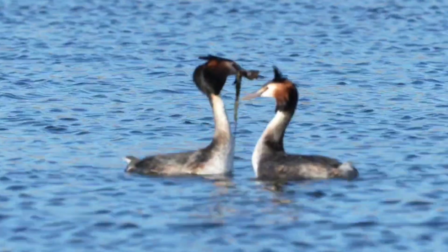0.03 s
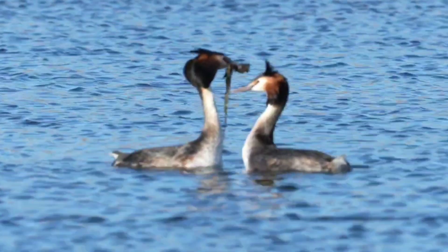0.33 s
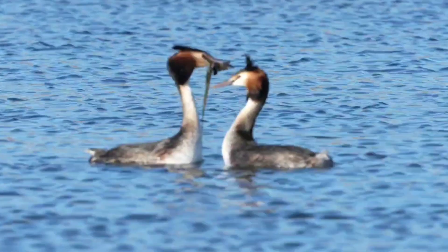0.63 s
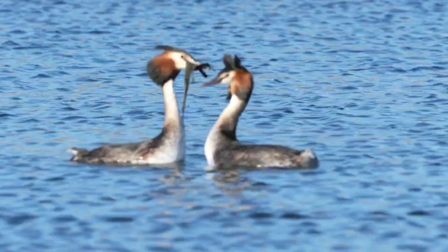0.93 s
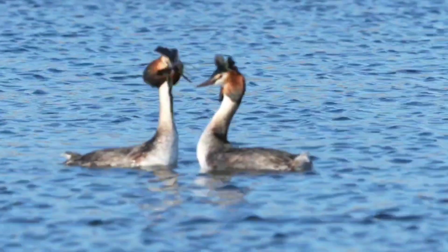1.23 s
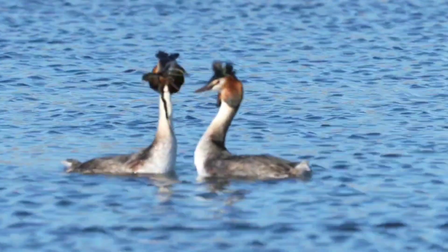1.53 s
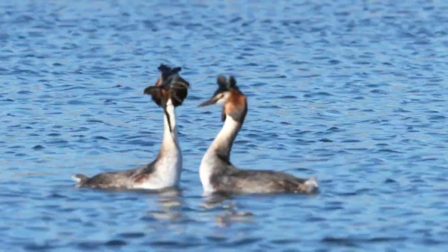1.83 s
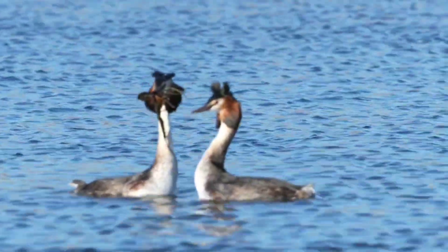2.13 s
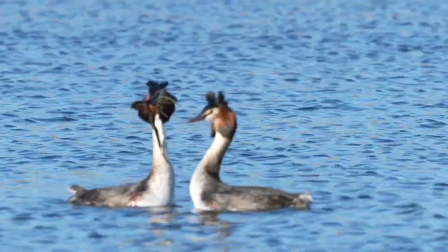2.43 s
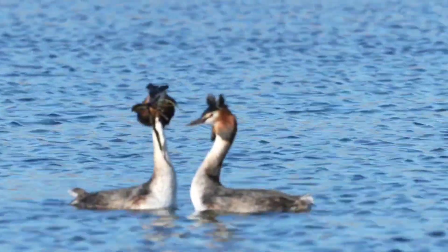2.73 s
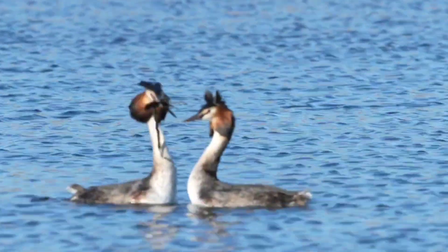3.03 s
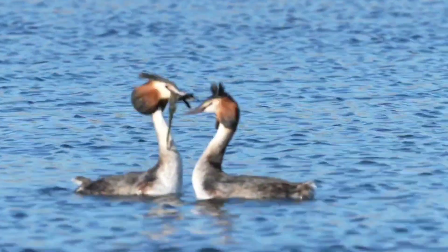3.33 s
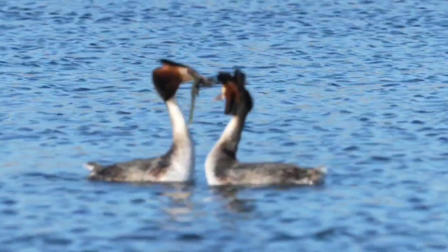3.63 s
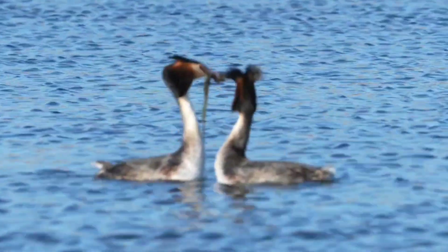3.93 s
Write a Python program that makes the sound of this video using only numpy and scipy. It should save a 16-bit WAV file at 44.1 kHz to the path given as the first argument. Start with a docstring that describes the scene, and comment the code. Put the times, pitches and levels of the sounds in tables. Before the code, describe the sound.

Low, gusty wind buffets a lakeside microphone while the camera clicks briefly from handling.

```python
"""Wind buffets a camera's microphone on a lake shore: eddies make a deep rumble and a flutter above it.
Handling clicks ring the camera's shell and body. Ripples and far-off noise form a soft wash that dips
at four hard buffets. A distant water bird gives two faint, rising whistles.
Near the end a low, distant drone swells."""
import sys
import numpy as np
from scipy import signal
from scipy.io import wavfile
from scipy.ndimage import uniform_filter1d

SR = 44100
rng = np.random.default_rng(int(sys.argv[2]) if len(sys.argv) > 2 else 0)


def dump_mix(stems):
    """Bounce the given channels to the path in sys.argv[1] as a 16-bit WAV at rate SR."""
    frames = np.atleast_2d(stems).T  # one column per channel
    limited = np.clip(frames, -1, 1)  # hard clip at full scale
    pcm = np.round(limited * 32767).astype(np.int16)
    wavfile.write(sys.argv[1], SR, pcm)


N = 176400
TIME = np.arange(N) / SR

# gusts: t/s, rumble drive/dB, flutter drive/dB
GUST_DRIVE = [(0.0, -27, -45), (0.17, -45, -40.5), (0.24, -30.5, -32), (0.28, -44.5, -43),
              (0.32, -29.5, -40), (0.38, -32, -30.5), (0.5, -32.5, -35), (0.54, -34, -45),
              (0.58, -29, -26.5), (0.606, -23, -36), (0.635, -28.5, -25.5), (0.73, -29.5, -32.5),
              (0.84, -22, -38.5), (0.91, -37, -38), (0.97, -18.5, -35), (1.12, -39.5, -48.5),
              (1.19, -37.5, -31), (1.22, -30.5, -50), (1.31, -40, -40.5), (1.53, -29, -49.5),
              (1.57, -25, -47), (1.65, -25.5, -31), (1.68, -17, -35), (1.705, -18.5, -43),
              (1.76, -34.5, -46), (1.86, -20.5, -39.5), (1.89, -44, -26.5), (1.96, -29.5, -48),
              (1.99, -22, -37.5), (2.07, -29, -33.5), (2.12, -18, -34), (2.17, -23, -58.5),
              (2.29, -25.5, -41.5), (2.33, -20, -34.5), (2.37, -30.5, -49), (2.47, -34, -60),
              (2.54, -34, -56), (2.67, -23.5, -42.5), (2.72, -33, -49.5), (2.85, -34.5, -42.5),
              (2.89, -23.5, -51.5), (2.93, -24, -26.5), (2.99, -32, -43.5), (3.1, -22, -33),
              (3.17, -38.5, -56.5), (3.2, -26.5, -36), (3.28, -24.5, -32.5), (3.31, -17.5, -31),
              (3.36, -34, -48.5), (3.46, -34, -45.5), (3.51, -29, -52), (3.56, -42.5, -40.5),
              (3.69, -31.5, -51), (3.72, -30, -35.5), (3.81, -37.5, -43.5), (3.92, -32.5, -48.5),
              (3.98, -28, -64.5)]
# eddy spectrum before the low-pass: f/Hz, relative density/dB
EDDY_SPECTRUM = [(12, 4), (25, 2), (40, -1), (78, -8), (120, -21), (180, -30), (330, -50.5), (700, -61.5)]
# eddy transit, left port to right: f/Hz, lag/s
PORT_LAG = [(20, 0.0033), (60, 0.0035), (110, 0.0022), (220, 0.0011), (400, 0.00031)]
# contacts: t/s, snap drive/dB, knock drive/dB, low-pass f/Hz, spot drive/dB, spot f/Hz
CONTACTS = [(0.562, -50, -42, 2180, -35, 1950), (0.602, -51, -50, 2000, -35, 2100),
            (0.607, -52, -33.5, 900, -26, 680), (.912, -56, -59, 2570, -32, 2120),
            (1.948, -44, -55, 4500, -34, 2800), (1.9527, -24.5, -36, 4240, -25.5, 3230),
            (1.983, -38, -48, 1700, -25, 1500), (2.06, -43, -55, 5000, -41.5, 4200),
            (2.189, -47, -49.5, 3000, -40, 3200), (2.2099, -36.5, -37, 5000, -31.5, 1970),
            (2.283, -43.5, -43, 3400, -31, 2800), (2.2855, -41, -33.5, 2000, -29, 1600),
            (2.332, -38, -37, 1900, -36, 1750), (2.3444, -33.5, -30, 6000, -28, 4200),
            (2.347, -47, -29, 1700, -27, 1720), (2.358, -59, -31, 1400, -24, 680),
            (2.377, -50, -27, 550, -30, 620)]
# camera shell (snap): f/Hz, gain/dB, T60/s
SHELL_MODES = [(1310, -18, 0.009), (1700, -22.5, 0.0065), (2110, -9.5, 0.012), (2610, 3, 0.0059),
               (2974, -3, 0.01), (3490, -3.5, 0.0054), (3770, 0.5, 0.012), (4290, -15, 0.0096)]
# camera body (knock): f/Hz, gain/dB, T60/s
BODY_MODES = [(490, -3.5, 0.022), (600, 5, 0.019), (800, -2.5, 0.011), (1018, 0.5, 0.0093),
              (1574, -2.5, 0.041), (1720, 1, 0.027)]
# lake and surroundings: f/Hz, relative density/dB
WASH_SPECTRUM = [(100, 6), (200, 0.5), (300, 2.5), (385, -6), (520, -9), (700, -11), (900, -21),
                 (1150, -25), (1600, -27), (2000, -26), (2750, -26), (3400, -32.5), (3850, -27.5),
                 (4500, -33)]
# wash balance: f/Hz, left minus right/dB
WASH_PAN = [(150, -8.5), (330, -5.5), (650, -14), (1180, 1.5), (2100, -6.5), (4000, -5)]
# wash dips at hard buffets: t/s, depth/dB, recovery/(dB/s)
WASH_DIPS = [(0.644, 2.5, 12.5), (1.674, 5.5, 18.5), (2.924, 5, 3.5), (3.304, 6.5, 8)]
# drone noise bands: f/Hz, width/Hz, relative level/dB
DRONE_BANDS = [(436, 42, -9), (511.5, 50, -2.5), (633, 220, -9)]
# pitch contour per whistle: t/s, f/Hz
WHISTLE_CONTOURS = [
    [(.08, 1245), (.16, 1280), (.3, 1300), (.35, 1470), (.43, 1520), (.57, 1545), (.62, 1490), (.69, 1260),
     (.76, 1160)],
    [(1.0, 1235), (1.14, 1275), (1.27, 1420), (1.36, 1460), (1.52, 1560)],
]
# per whistle: level/dB
WHISTLE_LEVELS = [-70, -73]


def wind(gain_db=4, rumble_hz=47.4, flutter_hz=115.7, lowpass_hz=298):
    """Eddies sweep the left port, then the right: deep rumble, lumpy flutter in the sharper gusts."""
    gust_s, *drives_db = np.transpose(GUST_DRIVE)
    rumble_db, flutter_db = (np.interp(TIME, gust_s, db) for db in drives_db)
    rumble_swing_db = 0.9 * (rumble_db - rumble_db.mean())
    flutter_swing_db = 1.63 * (flutter_db - flutter_db.mean()) + 1.5 * drift(rate_hz=62)
    out = 0
    for low_hz, high_hz, hz, gain in bands(EDDY_SPECTRUM, np.geomspace(10, 900, 12)):
        eddies = band_noise(low_hz, high_hz, correlation=0.82)
        eddies[1] = np.interp(TIME - at_hz(PORT_LAG, hz), TIME, eddies[1])
        eddies = steadied(eddies, span_s=0.05)
        flutter_share = at_hz([(rumble_hz, 0), (flutter_hz, 1)], hz)
        swing_db = (1 - flutter_share) * rumble_swing_db + flutter_share * flutter_swing_db
        out += gain * from_db(swing_db) * pan(-3 * flutter_share) * eddies
    return from_db(gain_db + rumble_db.mean()) * lowpass(out, lowpass_hz)


def handling(gain_db=-11.5, grit=0.086, grit_decay_s=0.0045, left_lag_s=0.00034):
    """Gritty contacts, hard or soft, ring the touched spot and the camera's shell and body."""
    snap, knock, spots = np.zeros((3, 2, N))
    age_s = TIME[:SR // 20]
    for start_s, snap_db, knock_db, lowpass_hz, spot_db, spot_hz in CONTACTS:
        force = grit * rng.standard_normal((2, len(age_s))) * np.exp(-age_s / grit_decay_s)
        force[0, int(left_lag_s * SR)] += 1
        force[1, 0] += 1
        force = lowpass(force, lowpass_hz)
        start = int(start_s * SR)
        span = slice(start, start + len(age_s))
        snap[:, span] += from_db(snap_db) * force
        knock[:, span] += from_db(knock_db) * force
        spots[:, span] += from_db(spot_db) * ring(force, spot_hz, t60_s=0.0054)
    shell = sum(from_db(db) * ring(snap, hz, t60_s) for hz, db, t60_s in SHELL_MODES)
    body = sum(from_db(db) * ring(knock, hz, t60_s) for hz, db, t60_s in BODY_MODES)
    return from_db(gain_db) * pan(-8) * (shell + body + spots)


def wash(gain_db=-44, murmur_hz=330, hiss_hz=1100, fade_db_per_s=0.44, wander_db=1.5):
    """Ripples and far surroundings: a slowly fading hiss over a low murmur that dips less."""
    dip_db = wash_dip_db()
    murmur_db = 0.81 * dip_db
    hiss_db = dip_db - fade_db_per_s * (TIME - TIME.mean())
    out = 0
    for low_hz, high_hz, hz, gain in bands(WASH_SPECTRUM, np.geomspace(100, 5000, 29)):
        hiss_share = at_hz([(murmur_hz, 0), (hiss_hz, 1)], hz)
        swing_db = hiss_share * hiss_db + (1 - hiss_share) * murmur_db
        swing_db += wander_db * drift(rate_hz=8.6)
        out += gain * from_db(swing_db) * pan(at_hz(WASH_PAN, hz)) * band_noise(low_hz, high_hz)
    return from_db(gain_db) * out


def wash_dip_db(attack_s=0.005):
    """Sudden drops at the listed times, slow recovery."""
    deepest_db = np.zeros(N)
    for start_s, depth_db, recovery_db_per_s in WASH_DIPS:
        age_s = TIME - start_s
        onset = np.clip(age_s / attack_s, 0, 1)
        deepest_db = np.maximum(deepest_db, onset * (depth_db - recovery_db_per_s * age_s))
    return -deepest_db


def drone(gain_db=-49.5, full_at_s=3.75, rise_db_per_s=36.5):
    """Far-off hum, perhaps traffic: noise bands swell, then hold."""
    swell_db = -rise_db_per_s * np.maximum(full_at_s - TIME, 0)
    hum = sum(from_db(db) * band_noise(hz - width_hz / 2, hz + width_hz / 2)
              for hz, width_hz, db in DRONE_BANDS)
    return from_db(gain_db + swell_db) * pan(-11.5) * hum


def bird(fade_s=0.05, waver=0.011, flicker_db=2, scatter_db=-4, scatter_hz=44.9):
    """Two thin whistles climb unevenly, the first falling at its end; distance blurs the tone."""
    out = np.zeros((2, N))
    for contour, level_db in zip(WHISTLE_CONTOURS, WHISTLE_LEVELS):
        times_s, pitches_hz = np.transpose(contour)
        hz = np.interp(TIME, times_s, pitches_hz) * (1 + waver * drift(rate_hz=25))
        tone = np.exp(2j * np.pi * np.cumsum(hz) / SR)
        gate = np.clip(np.minimum(TIME - times_s[0], times_s[-1] - TIME) / fade_s, 0, 1)
        envelope = gate * from_db(level_db + flicker_db * drift(rate_hz=11))
        scatter = np.array([drift(scatter_hz) + 1j * drift(scatter_hz) for _ in range(2)])
        out += envelope * np.real((1 + from_db(scatter_db) * scatter) * tone)
    return out


def from_db(db):
    """Decibels to gain."""
    return 10 ** (np.asarray(db) / 20)


def unit_rms(x):
    """Scale to rms 1."""
    return x / np.sqrt(np.mean(x ** 2) + 1e-20)


def at_hz(points, hz):
    """Table lookup on a log-frequency axis."""
    points_hz, values = np.transpose(points)
    return np.interp(np.log(hz), np.log(points_hz), values)


def pan(db):
    """Stereo gains for a left-minus-right level."""
    return unit_rms(from_db(np.array([[db], [-db]]) / 2))


def lowpass(x, hz):
    """Second-order Butterworth."""
    return signal.sosfilt(signal.butter(2, hz, fs=SR, output="sos"), x)


def drift(rate_hz):
    """Random wander, rms 1, rolling off above rate_hz."""
    hop, warmup = 40, 2000
    pole = np.exp(-2 * np.pi * rate_hz * hop / SR)
    noise = rng.standard_normal(N // hop + warmup + 2)
    slow = signal.lfilter([1], [1, -2 * pole, pole * pole], noise)[warmup:]
    return np.interp(np.arange(N) / hop, np.arange(len(slow)), unit_rms(slow))


def band_noise(low_hz, high_hz, correlation=0.033):
    """Stereo noise band, rms 1; sides nearly independent by default."""
    sos = signal.butter(2, [low_hz, high_hz], "band", fs=SR, output="sos")
    mid, side = signal.sosfilt(sos, rng.standard_normal((2, N + SR // 2)))[:, -N:]
    return unit_rms(np.sqrt(1 + correlation) * mid + np.sqrt(1 - correlation) * side * [[1], [-1]])


def bands(spectrum, edges_hz):
    """Rows of low/Hz, high/Hz, centre/Hz, gain; powers sum to 1."""
    centres_hz = np.sqrt(edges_hz[1:] * edges_hz[:-1])
    gains = from_db(at_hz(spectrum, centres_hz)) * np.sqrt(np.diff(edges_hz))
    return zip(edges_hz, edges_hz[1:], centres_hz, gains / np.linalg.norm(gains))


def steadied(x, span_s):
    """Divide noise by its running rms."""
    power = uniform_filter1d(np.mean(x ** 2, axis=0), int(span_s * SR))
    return x / np.sqrt(power + 1e-9)


def ring(force, hz, t60_s):
    """One mode: a unit impulse starts a decaying sine of height 1."""
    radius = from_db(-60 / (t60_s * SR))
    angle = 2 * np.pi * hz / SR
    return signal.lfilter([0, np.sin(angle)], [1, -2 * radius * np.cos(angle), radius ** 2], force + 1e-18)


def scene():
    """Wind and clicks at the microphone, the lake behind."""
    return wind() + handling() + drone() + wash() + bird()


def record(dry, cutoff_hz=4670):
    """Steep treble cut."""
    return signal.sosfilt(signal.ellip(10, 0.2, 80, cutoff_hz, fs=SR, output="sos"), dry)


dry = scene()
out = record(dry)
dump_mix(out)
```